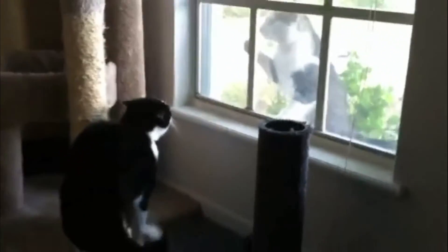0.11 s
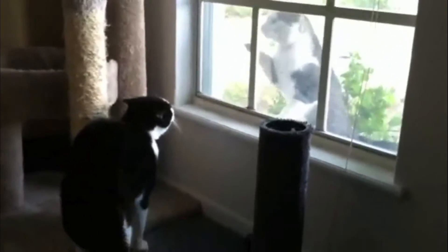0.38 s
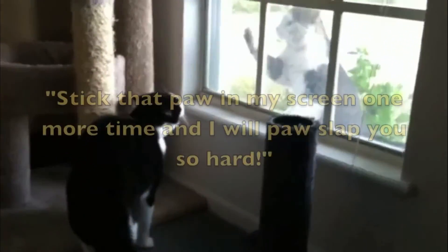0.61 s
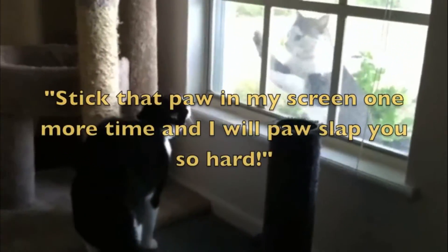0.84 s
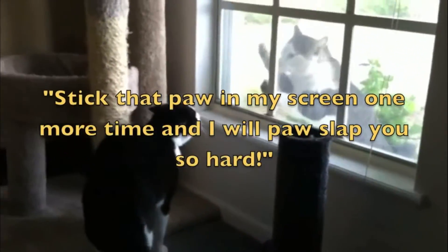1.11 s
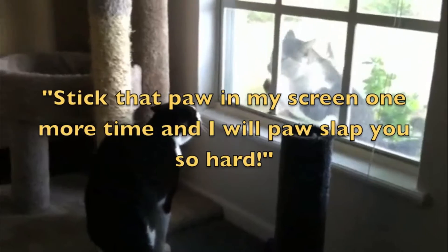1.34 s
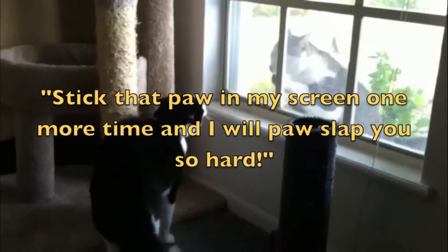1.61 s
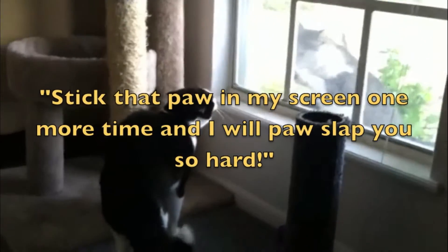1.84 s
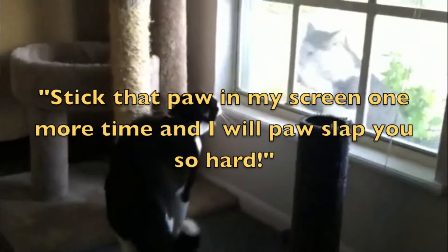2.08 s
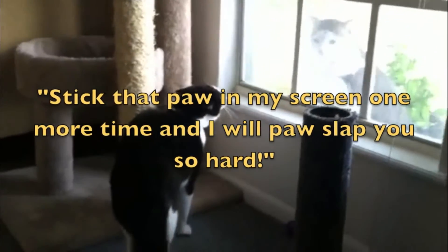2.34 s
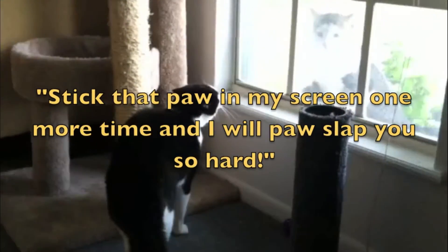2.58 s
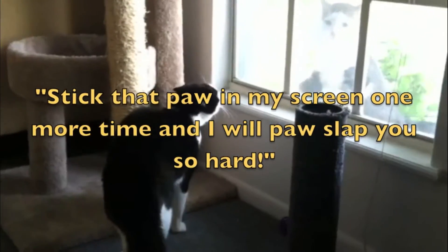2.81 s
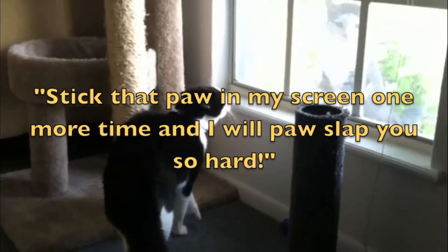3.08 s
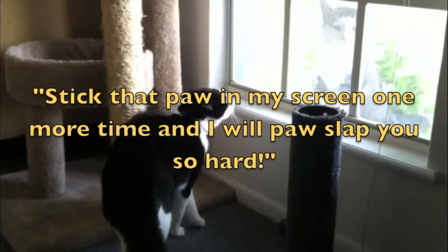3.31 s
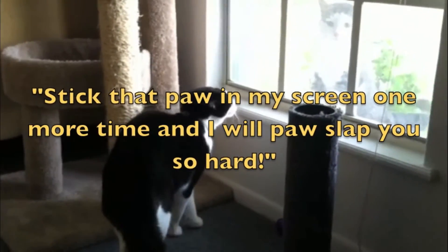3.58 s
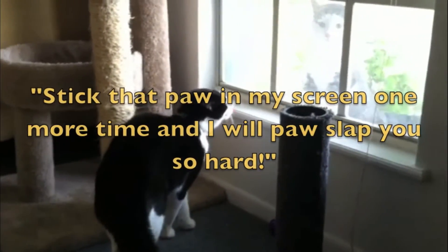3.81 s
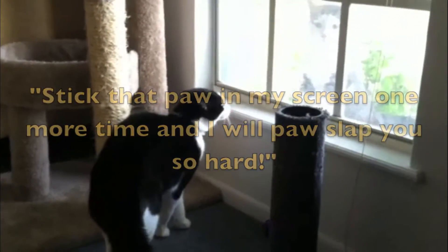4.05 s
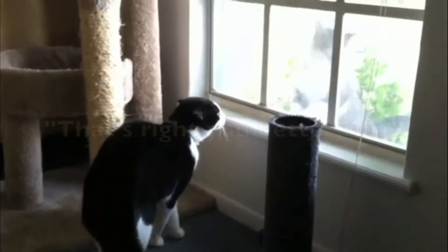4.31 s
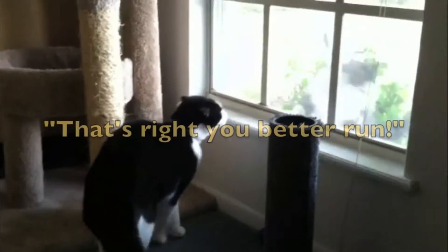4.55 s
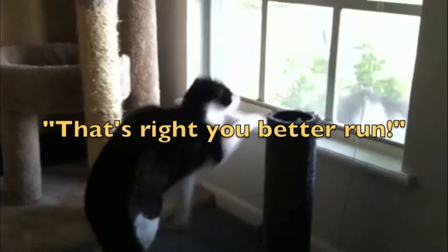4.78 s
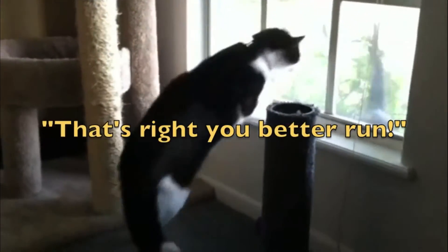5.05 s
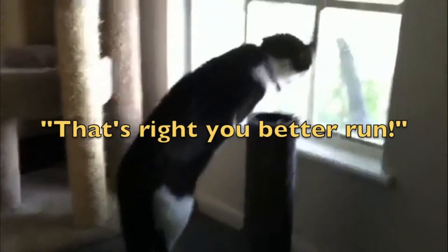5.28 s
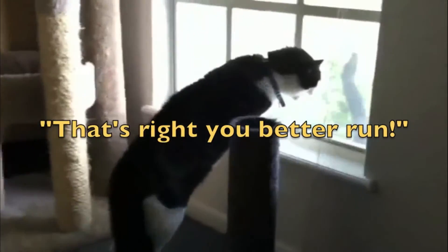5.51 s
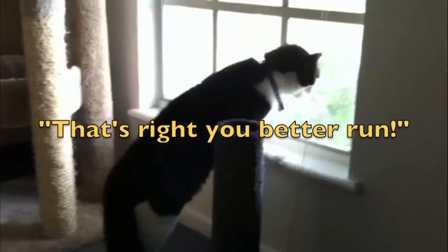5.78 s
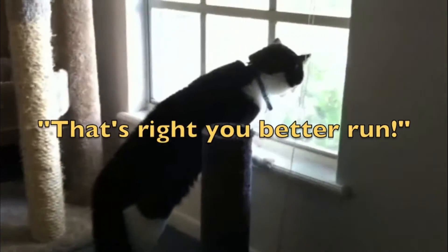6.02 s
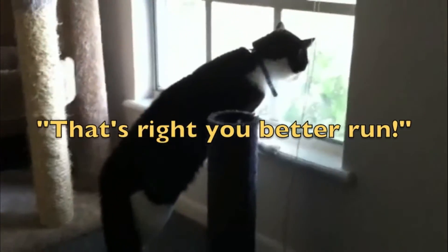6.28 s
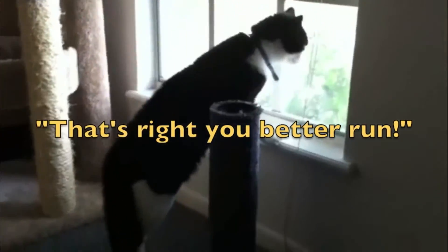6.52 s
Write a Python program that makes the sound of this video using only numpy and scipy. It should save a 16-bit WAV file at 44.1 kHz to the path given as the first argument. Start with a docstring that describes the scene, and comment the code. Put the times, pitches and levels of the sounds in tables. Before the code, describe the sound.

A small quiet room with low soft hiss and barely audible wavering hums, the microphone a few steps from a house cat; short, sparse echoes follow each sound. At about 0.3 s two quick soft paw taps, the first with a tiny claw tick. From 0.6 to 3.35 s a long angry yowl: it jumps up with a hoarse catch, opens into a bright nasal wail, swells and climbs slowly to its highest and loudest around 1.7 to 2 s, then eases down and drops sharply at the close. Two dull paw thuds lie under it near 1.2 s. Quiet until 4.9 s, when a tiny collar bell tinkles in small irregular jolts until 5.3 s. At 5.2 s the second yowl rises fast, peaks near 5.7 s, then sinks steadily, the mouth closing into a low, dark, slightly rough moan by 6.6 s.

```python
"""House cat yowling

A small quiet room, the microphone a few steps from a house cat that gives two long yowls.
Each yowl is a clean, gliding stack of harmonics through two resonances, breathy in places.
Its collar bell tinkles and its paws thud softly, both as dying sines; noise and faint hums lie behind.
Sparse random echoes give the room."""
import sys
import numpy as np
from scipy import signal
from scipy.io import wavfile
from scipy.ndimage import uniform_filter1d

SR = 44100
rng = np.random.default_rng(int(sys.argv[2]) if len(sys.argv) > 2 else 0)


def log_audio(samples):
    """Write samples as a 16-bit WAV file to the path given in sys.argv[1]."""
    # one column per channel
    frames = np.atleast_2d(samples).T
    # limit to full scale, then quantise
    limited = np.clip(frames, -1, 1)
    pcm = np.round(limited * 32767).astype(np.int16)
    wavfile.write(sys.argv[1], SR, pcm)


def ratio(d):
    """dB to gain"""
    e = np.asarray(d, float) / 20
    return 10 ** e


N = 292547  # length in samples

# Spectrum of the quiet house and microphone hiss: f/Hz, relative level per Hz/dB
HUSH_SPECTRUM = [(30, 3), (85, -18.5), (105, -26), (192, 9.5), (277, 4.5), (399, 1.5), (520, 0), (700, 0),
                 (1000, -2), (2130, -8.5), (2800, -11), (3800, -14), (6370, -13), (8700, -24),
                 (14000, -30.5), (15500, -42), (15800, -68.5)]
HUSH_DB = -62.5  # rms
# Faint hums of the house: f/Hz, rms level/dB about which each wavers
HOUSE_HUMS = [(118, -82), (200, -79.5), (360, -77), (403, -72.5), (601, -80), (728, -77.5)]
# Decay of the room's echoes: f/Hz, t60/s
ROOM_DECAY = [(300, 0.37), (900, 0.35), (2100, 0.34), (6000, 0.3), (14000, 0.027)]
ROOM_DB = -13  # echoes against the near sound

# Soft paw falls: t/s, peak level of the thud/dB, level of the claw tick/dB
PAW_FALLS = [(.276, -46, -45.5), (.318, -47.5, -83), (1.215, -45.5, -90), (1.255, -40.5, -89)]
# Modes of the floor boards: f/Hz, relative level/dB, t60/s
FLOOR_MODES = [(188, -8, 0.093), (279.4, -11.5, 0.16), (403, -4.5, 0.17), (638, -3, 0.044),
               (1100, -0.5, 0.01)]
# Blows of the collar bell: t/s, peak level/dB
BELL_BLOWS = [(4.8754, -52), (4.898, -53.5), (4.9245, -48.5), (4.9852, -59.5), (4.9922, -64), (5.022, -60),
              (5.1052, -63.5), (5.228, -59.5), (5.291, -48)]
# Modes of the bell: f/Hz, relative level/dB, t60/s
BELL_MODES = [(5600, -9, .04), (5980, -1.5, 0.036), (6080, -15.5, .03)]

# Pitch glide, one table a yowl: t/s, f/Hz
PITCH_GLIDES = [
    [(.59, 359.4), (.64, 561), (.695, 522.4), (.738, 677.5), (.76, 707), (.782, 694.3), (.794, 614),
     (.83, 633.2), (.9, 624.6), (1.11, 639.4), (1.36, 670.6), (1.5, 717.7), (1.61, 727.7), (1.65, 750.3),
     (1.7, 738.8), (1.8, 764), (1.88, 754.3), (2.15, 717.3), (2.34, 708.6), (2.52, 645.3), (2.97, 634.7),
     (3.09, 595.6), (3.14, 589.7), (3.21, 583), (3.29, 479), (3.324, 379.3), (3.35, 403.4)],
    [(5.212, 419.3), (5.232, 425), (5.262, 537.8), (5.36, 642.7), (5.42, 648.2), (5.51, 682.7),
     (5.62, 690.6), (5.68, 717), (5.75, 714), (5.86, 689.7), (5.98, 688), (6.1, 670.2), (6.18, 668),
     (6.27, 652.7), (6.35, 602.3), (6.42, 583.6), (6.52, 471), (6.575, 471), (6.6, 498), (6.634, 491)],
]
# Voice, one table a yowl: t/s, effort level/dB, mouth resonance f/Hz, throat resonance f/Hz
VOICE_MOVES = [
    [(0.59, -68, 348, 2878), (0.64, -56.5, 820, 3300), (0.69, -56, 880, 3280), (0.73, -59.5, 1310, 3420),
     (0.79, -56.5, 1380, 3400), (0.83, -60.8, 1206, 2480), (0.93, -57.5, 1296, 2470),
     (1.05, -56.5, 1450, 2449), (1.2, -54, 1370, 3200), (1.38, -53.5, 1496, 2470), (1.47, -48, 1700, 2596),
     (1.66, -46.5, 1880, 2730), (1.82, -47, 1900, 2590), (1.97, -45, 1806, 2914), (2.11, -47, 1473, 2694),
     (2.3, -46.5, 1580, 2840), (2.42, -49, 1372, 2650), (2.53, -52.5, 1215, 3170), (2.68, -55, 1306, 2780),
     (2.99, -54.5, 1326, 2580), (3.1, -55, 1157, 3100), (3.2, -57, 1220, 2720), (3.28, -49, 929, 3300),
     (3.325, -53.5, 600, 3286), (3.35, -65.5, 960, 2730)],
    [(5.212, -68.5, 702, 2805), (5.235, -57.5, 980, 3000), (5.28, -52.5, 1083, 3250),
     (5.36, -49.5, 1693, 3380), (5.47, -45, 1666, 3200), (5.57, -50, 1800, 2590), (5.63, -47.5, 1700, 2400),
     (5.72, -48, 1676, 3050), (5.82, -50.5, 1430, 2890), (6.07, -51.5, 1430, 2550),
     (6.2, -53.5, 1430, 2595), (6.28, -51, 974, 2220), (6.37, -49.5, 890, 2710), (6.44, -47.5, 806, 2830),
     (6.48, -46, 545, 3300), (6.58, -46.5, 443, 3320), (6.634, -44.5, 527, 3084)],
]
# Mouth: t/s, opening/0-1, upper harmonics' level over the effort/dB, sheen from SHEEN_HZ/dB per octave
MOUTH_MOVES = [(.6, 0.6, -22, -4), (.69, 0.01, 5.5, 5), (.73, 0.1, -6, 8), (.785, 0.2, -5.5, 19),
               (.83, 0.94, 1.5, 9), (1.2, 0.97, 2, 9), (1.5, 0.96, 2.3, -1), (1.85, 0.7, 6, -6),
               (2.35, 1, -1.6, 5.5), (2.55, 0.55, 1, 1), (3.2, 0.49, 1.6, -11), (3.279, 0.01, 5.5, 0.1),
               (3.35, 0.05, 0.5, 1), (5.231, 0.01, -9, -4), (5.33, 0.14, -5, 7), (5.42, 1, -4, -2),
               (5.72, 1, 2.5, 1), (5.85, 0.96, 0, -4.5), (6.25, 0.84, -1.5, -6), (6.35, 0.88, -12.5, 3),
               (6.46, 0.43, -16, 17), (6.58, .1, -38.5, 0)]
# Throat colour above harmonic 4, mouth nearly shut: f/Hz, relative level/dB
THROAT_SHUT = [(2300, 11), (3250, -14), (3900, -8), (4350, 2), (4900, -14), (6000, -21), (9500, -34),
               (15500, -48)]
# Throat colour above harmonic 4, mouth half open: f/Hz, relative level/dB
THROAT_HALF = [(2900, -1), (3300, -6), (3900, -1), (4700, -3), (5600, -21), (6450, -8), (7300, -21),
               (9500, -33), (11100, -25), (12200, -38), (15500, -45)]
# Throat colour above harmonic 4, mouth wide open: f/Hz, relative level/dB
THROAT_WIDE = [(2900, 4), (3250, -2), (3700, 0), (4250, -17), (5000, -9), (5750, -18), (6600, -5),
               (7500, -14), (9000, -19), (10200, -41), (11000, -42), (11900, -35), (13000, -46),
               (15500, -52)]
# Hoarse moments: middle t/s, half length/s, breath turbulence level/dB
HOARSE_MOMENTS = [(.67, .08, -25), (.76, .06, -25), (1.535, .03, -30), (1.66, .045, -34), (1.77, .03, -39),
                  (3.295, .05, -28), (5.25, .08, -32), (5.65, .03, -35), (6.48, .1, -30)]
# One harmonic dips briefly (above 0 dB: rises), as when echoes cancel it:
# middle t/s, half length/s, level change/dB, harmonic number
HARMONIC_DIPS = [(0.743, 0.01, -9, 2), (.76, 0.033, -22, 4), (0.797, 0.0056, -1.5, 2), (.9, 0.17, -9.5, 3),
                 (1.19, 0.013, 1.5, 4), (1.39, 0.021, -1, 3), (1.638, 0.013, -7, 3), (1.703, 0.013, -13, 3),
                 (1.758, 0.034, -18, 3), (1.826, 0.014, -17, 3), (1.83, 0.028, -1, 4),
                 (1.893, 0.043, -9.5, 4), (1.998, 0.021, -18, 3), (3.01, 0.038, -16, 3),
                 (3.088, 0.03, -3.5, 2), (3.18, 0.11, -12, 1), (3.223, 0.011, -10, 2),
                 (3.259, 0.017, -11.5, 2), (5.445, .025, -10, 3), (5.477, 0.032, -6.5, 2),
                 (5.54, 0.05, -6, 1), (5.627, 0.022, -13, 3), (5.628, 0.029, -9.5, 4),
                 (5.71, 0.093, -17, 2), (5.94, 0.13, -4.5, 1), (6.02, .035, -10, 4), (6.275, 0.024, -11, 2),
                 (6.581, 0.0054, -8, 1)]

TILT_DB_PER_OCT = 4  # folds and lips together
MOUTH_WIDTH_HZ, THROAT_WIDTH_HZ = 120, 292  # widths of the two resonances
SHEEN_HZ, SOFT_SHARE = 6340, 0.27  # a dull top also takes this share off harmonics 3 and 4
LOW_WAVER_DB, UPPER_WAVER_DB = 0.7, 2.5
CLEAR_DB = -48  # breath turbulence of the clear voice
RASP = 4  # breath turbulence shakes the top by this many times more


def evened(x):
    """Scales to rms 1."""
    return x / np.sqrt(np.mean(x ** 2) + 1e-20)


def read(points, hz):
    """Reads a spectrum on a log-frequency axis."""
    f, value = np.transpose(points)
    return np.interp(np.log(hz + 1), np.log(f + 1), value)


def add(mix, s, sound):
    """Mixes a sound in at time s."""
    part = mix[round(s * SR):][:len(sound)]
    part += sound[:len(part)]


def drift(size, span):
    """Smooth random wander of rms 1, span samples to a bend."""
    noise = rng.standard_normal(size)
    return evened(uniform_filter1d(uniform_filter1d(noise, int(span)), int(span)))


def bump(t, middle_s, half_s):
    """A smooth hump of height 1."""
    return np.cos(np.pi / 2 * np.clip((t - middle_s) / half_s, -1, 1)) ** 2


def peak_db(hz, centre_hz, width_hz):
    """Gain of one resonance, 0 dB far below it."""
    return 20 * np.log10(centre_hz ** 2 / np.hypot(centre_hz ** 2 - hz ** 2, hz * width_hz))


def ring(modes):
    """Dying sines of a struck object, peak 1."""
    t = np.arange(SR // 4) / SR
    sound = sum(ratio(db - 60 * t / t60) * np.sin(2 * np.pi * (hz * t + rng.random()))
                for hz, db, t60 in modes)
    sound = sound * (1 - np.exp(-t / 0.00052))  # soft onset
    return sound / abs(sound).max()


def hush():
    """The quiet house, with faint wavering hums, and the microphone's hiss: patchy shaped noise and sines."""
    frames, bin_hz = N // 256 + 5, np.fft.rfftfreq(1024, 1 / SR)
    real, imaginary, patches = rng.standard_normal((frames, 513, 3)).T
    patches = uniform_filter1d(patches, size=12, axis=0)
    patches = evened(uniform_filter1d(patches, size=14, axis=1))
    bins = (real + 1j * imaginary) * ratio(read(HUSH_SPECTRUM, bin_hz)[:, None] + .9 * patches)
    noise = signal.istft(bins, nperseg=1024, noverlap=768)[1][:N]
    t = np.arange(N) / SR
    hums = sum(ratio(db + 2.1 * drift(N, span=16000))
               * np.sin(2 * np.pi * hz * t + 0.78 * drift(N, span=980)) for hz, db in HOUSE_HUMS)
    return ratio(HUSH_DB) * evened(noise) + np.sqrt(2) * hums


def room(x):
    """Sparse echoes of random sign, each band dying at its own speed."""
    taps = np.zeros(SR)
    at = np.arange(200, SR - 20, 20)
    taps[at + rng.integers(0, 20, len(at))] = rng.choice([-1., 1.], len(at))
    hz, t, bins = signal.stft(taps, SR, nperseg=256)
    decay = ratio(-60 * t / read(ROOM_DECAY, hz)[:, None])
    tail = signal.istft(bins * decay, SR, nperseg=256)[1]
    return signal.fftconvolve(x, tail / np.linalg.norm(tail))[:N]


def paws():
    """A pad thumps the floor boards, at times with the noisy tick of a claw."""
    out, t = np.zeros(N), np.arange(400) / SR
    for s, db, tick_db in PAW_FALLS:
        add(out, s, ratio(db) * ring(FLOOR_MODES))
        scratch = uniform_filter1d(rng.standard_normal(400), size=3)
        add(out, s, ratio(tick_db) * np.exp(-t / 0.0014) * scratch)
    return out


def collar():
    """A small bell on the collar rings briefly at each jolt."""
    out = np.zeros(N)
    for s, db in BELL_BLOWS:
        add(out, s, ratio(db) * ring(BELL_MODES))
    return out


def lower_harmonics(t, glide, angle, lag, effort_db, edge_db, mouth_hz, throat_hz):
    """Harmonics 1 to 4 of the folds, lifted by the two moving resonances."""
    order = np.arange(1, 5)[:, None]
    level_db = effort_db + TILT_DB_PER_OCT * np.log2(order)
    level_db = level_db + peak_db(order * glide, mouth_hz, MOUTH_WIDTH_HZ)
    level_db = level_db + peak_db(order * glide, throat_hz, THROAT_WIDTH_HZ)
    level_db = level_db + SOFT_SHARE * np.minimum(edge_db, 0) * (order > 2)
    level_db = level_db + sum(db * bump(t, at, half) * (order == round(k))
                              for at, half, db, k in HARMONIC_DIPS)
    level_db = level_db + LOW_WAVER_DB * np.array([drift(len(t), span=650) for k in order])
    return (np.sqrt(2) * ratio(level_db) * np.cos(order * angle + lag[order])).sum(0)


def upper_harmonics(hz, angle, lag, level_db, mouth, sheen_db):
    """Harmonics 5 to 29, coloured by the throat as the mouth opens."""
    order = np.arange(5, 30)[:, None]
    # the throat's colour blends from shut to half to wide open
    shut, wide = np.clip(1 - 2 * mouth, 0, 1), np.clip(2 * mouth - 1, 0, 1)
    blend = zip((shut, 1 - shut - wide, wide), (THROAT_SHUT, THROAT_HALF, THROAT_WIDE))
    shape = ratio(sum(share * read(throat, order * hz) for share, throat in blend))
    shape = shape * (order * hz < 15550)
    shape = shape / np.sqrt((shape ** 2).sum(0) / 2)  # the stack's rms is 1 before the sheen
    shape = shape * ratio(sheen_db * np.log2(np.clip(order * hz, SHEEN_HZ, 9300) / SHEEN_HZ))
    # each upper harmonic swells and fades on its own as the head moves
    waver = ratio(UPPER_WAVER_DB * np.array([drift(hz.size, span=950) for k in order]))
    return ratio(level_db) * (shape * waver * np.cos(order * angle + lag[order])).sum(0)


def yowl(pitch, voice):
    """Vocal folds give a gliding harmonic stack; turbulent breath shakes its size and timing."""
    s, *controls = np.transpose(voice)
    t = np.arange(s[0], s[-1], 1 / SR)
    effort_db, mouth_hz, throat_hz = (np.interp(t, s, c) for c in controls)
    when, *controls = np.transpose(MOUTH_MOVES)
    mouth, edge_db, sheen_db = (np.interp(t, when, c) for c in controls)
    breath = ratio(CLEAR_DB) + sum(ratio(db) * bump(t, at, half) for at, half, db in HOARSE_MOMENTS)
    glide = uniform_filter1d(np.interp(t, *np.transpose(pitch)), size=150)
    hz = glide * (1 + 0.0027 * drift(len(t), span=260))
    hz = hz * (1 + .2 * breath * drift(len(t), span=100))
    # timing jitter smears harmonic k by k times as much, so the top turns hoarse first
    angle = 2 * np.pi * np.cumsum(hz) / SR + .5 * breath * drift(len(t), span=33)
    lag = 2 * np.pi * rng.random(30)
    low = lower_harmonics(t, glide, angle, lag, effort_db, edge_db, mouth_hz, throat_hz)
    upper = upper_harmonics(hz, angle, lag, effort_db + edge_db, mouth, sheen_db)
    # the weak top is always a little hoarse
    rasp = 1 + (ratio(-23) + RASP * breath) * drift(len(t), span=45)
    folds = low + upper * rasp
    shaken = folds * (1 + breath * drift(len(t), span=40))
    return s[0], shaken * signal.windows.tukey(len(t), .004)


def scene():
    """The cat, its collar and paws sound in the room over the hush."""
    near = collar() + paws()
    for call in zip(PITCH_GLIDES, VOICE_MOVES):
        add(near, *yowl(*call))
    return (near + ratio(ROOM_DB) * room(near) + hush())[None]


def roll_off(x):
    """The treble ends steeply here."""
    return signal.sosfilt(signal.butter(12, 15640, fs=SR, output="sos"), x)


def record(dry):
    """The microphone rolls off the bass below 110 Hz."""
    bass_cut = signal.butter(2, 110, "highpass", fs=SR, output="sos")
    thin = signal.sosfilt(bass_cut, dry)
    return roll_off(thin)


dry = scene()
out = record(dry)
log_audio(out)
```